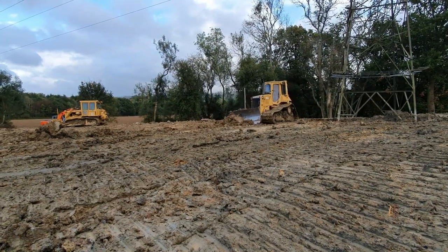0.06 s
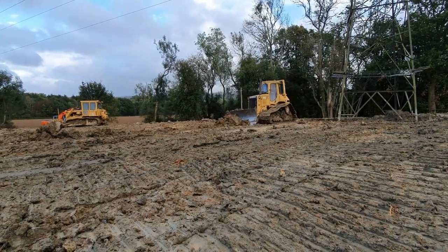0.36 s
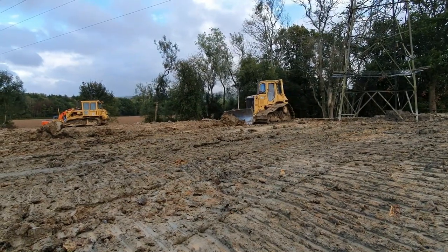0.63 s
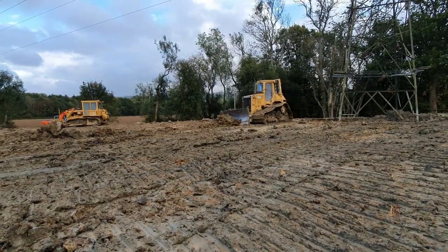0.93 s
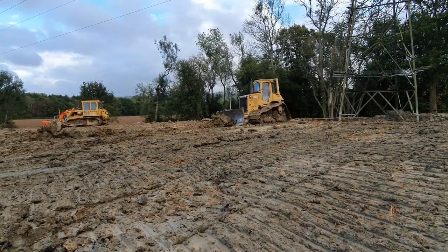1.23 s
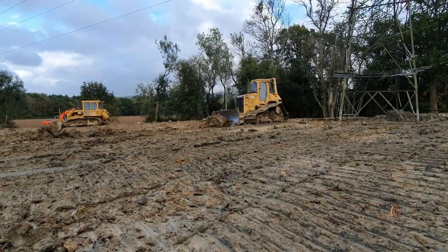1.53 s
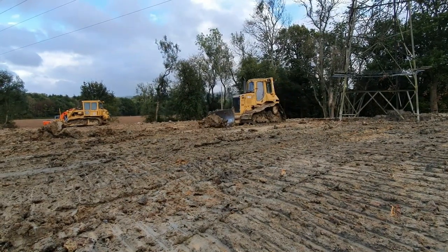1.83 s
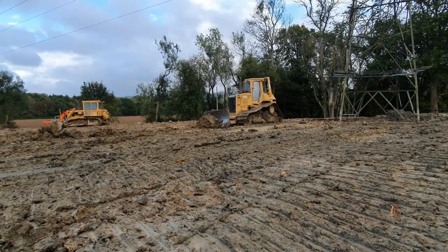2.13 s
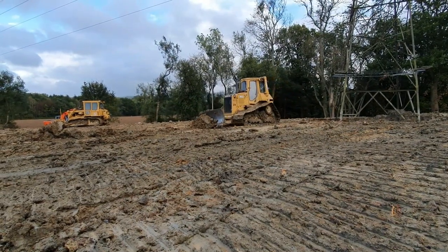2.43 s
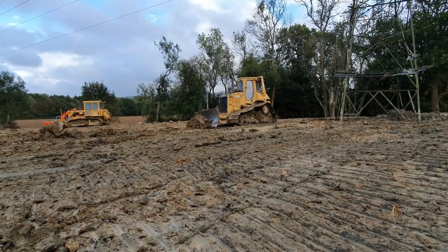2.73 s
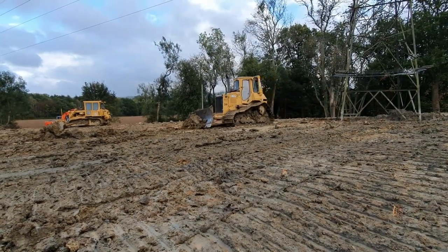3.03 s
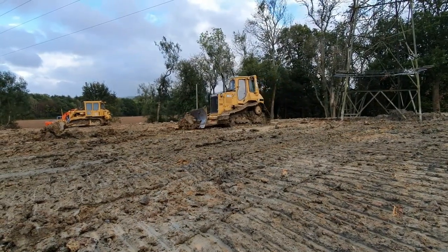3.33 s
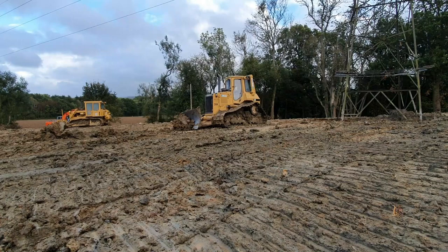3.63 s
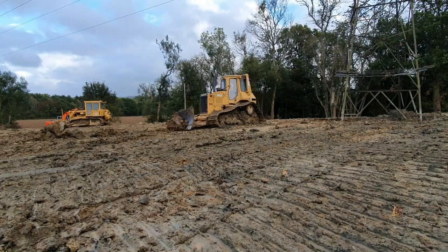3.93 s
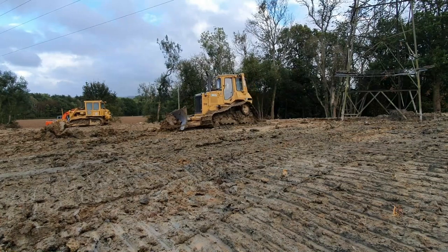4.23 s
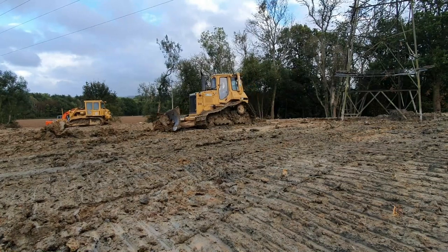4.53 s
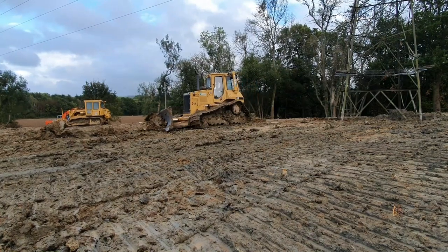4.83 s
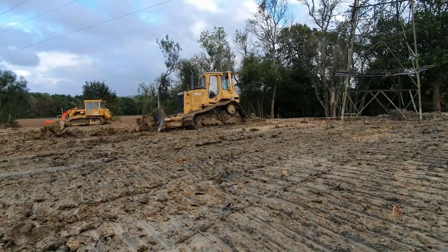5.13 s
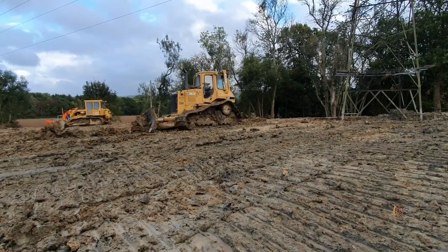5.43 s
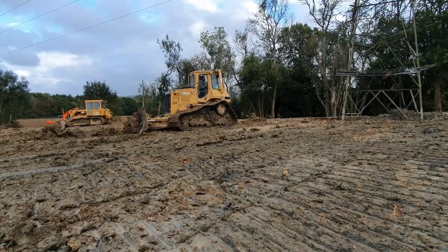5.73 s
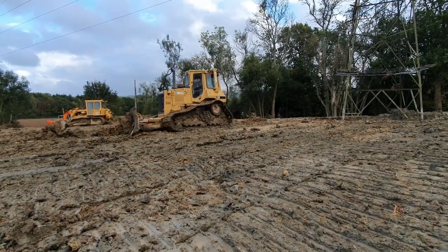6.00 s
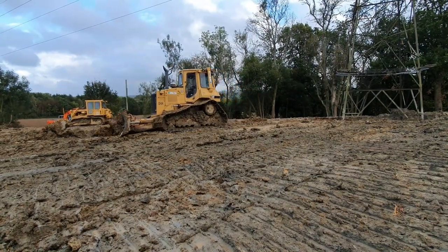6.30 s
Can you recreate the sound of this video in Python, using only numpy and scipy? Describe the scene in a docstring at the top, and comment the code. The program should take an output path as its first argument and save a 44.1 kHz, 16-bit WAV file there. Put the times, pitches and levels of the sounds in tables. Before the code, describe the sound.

A bulldozer's diesel engine runs from the start, a steady low drone with rattling clatter, a humming fan, gritty hiss and a thin, wavering turbo whistle. Its steel track shoes clank about six times a second, each with a short metallic ring. Light wind buffets the microphone around 0.4 and 1.8 seconds. From about 2 seconds, dull thuds join the clanks more regularly and the tracks sound heavier. Between 3 and 5.5 seconds the engine rises slightly in pitch, with a faint gear whine underneath. A dry track pin gives faint high squeals, clearest near 2.8 and 6.3 seconds. The machine grows a little louder as it creeps closer, drifting gently from right to left, and is still moving at the end, about 6.5 seconds in. The setting is an open field with no echo.

```python
"""A steady diesel drone, with steel track shoes knocking about six times a second: a crawler dozer
creeps closer over a muddy field, passing from right to left. The firings drive the exhaust note and make
the block clatter and hiss; a fan hums, gears whine and a thin turbo whistle follows the load.
Each shoe clanks onto the sprocket and thuds onto the rollers, ringing its link and the track frame.
A dry pin squeals faintly now and then, and a light breeze buffets the microphone."""
import sys
import numpy as np
from scipy import signal
from scipy.fft import rfft, irfft, next_fast_len
from scipy.io import wavfile
from scipy.ndimage import uniform_filter1d, map_coordinates

SR = 44100
rng = np.random.default_rng(int(sys.argv[2]) if len(sys.argv) > 2 else 0)


def dump_mix(stems):
    """Bounce the given channels to the path in sys.argv[1] as a 16-bit WAV at rate SR."""
    frames = np.atleast_2d(stems).T  # one column per channel
    limited = np.clip(frames, -1, 1)  # hard clip at full scale
    pcm = np.round(limited * 32767).astype(np.int16)
    wavfile.write(sys.argv[1], SR, pcm)


N = 284886
TIME = np.arange(N) / SR

# Engine speed. Each row: time in seconds, firings per second.
FIRING_RATE = [(0.0, 62.6), (0.6, 61.6), (0.85, 62.3), (1.3, 62.55), (1.6, 61.9), (2.05, 61.6),
               (2.55, 61.85), (3.05, 63.45), (4.05, 63.6), (4.8, 64.25), (5.55, 65.7), (5.9, 65.15),
               (6.46, 65.1)]
# The dozer draws near and turns side-on. Each row: time in seconds, approach in dB.
APPROACH = [(0, -3), (1.1, -1.5), (2.2, -1.5), (3.3, 0.5), (4.3, -0.3), (5.4, 0.5), (6.46, 0)]
# Faders that ride the approach. Each pair: base level in dB, dB gained per dB of approach.
RUMBLE_LEVEL, GROWL_LEVEL = (-22, 0.42), (-34, 1.0)
CLATTER_LEVEL, LOW_HISS_LEVEL = (-38.5, -0.29), (-48.5, 0.83)
# Stereo image of the noise beds. Each row: frequency in Hz, left-right likeness from 0 to 1.
LIKENESS = [(60, .99), (150, .99), (300, .96), (500, .8), (1000, .86), (2000, .84), (4000, .72),
            (8000, .71), (14000, .57)]

# The exhaust note builds as the engine takes the load. Each row: time in seconds, fader in dB.
DRONE_FADER = [(0.0, -22.5), (0.12, -20), (0.36, -28.5), (0.66, -21.5), (0.97, -17), (1.3, -18.5),
               (3.0, -18.5), (4.3, -17), (6.46, -17)]
# The pipe's hum on the third harmonic. Each row: time in seconds, level in dB.
PIPE_FADER = [(0, -28.5), (.7, -32), (1.3, -29.5), (2.5, -28), (2.95, -31), (3.3, -28), (4.7, -33.5),
              (5.1, -32), (5.5, -34.5), (6.0, -28), (6.46, -42)]
# Exhaust partials from unequal cylinders. Each entry: pitch in quarters of the firing rate.
CYLINDER_QUARTERS = [3, 5, 6, 7, 8, 10, 13, 14, 16, 26, 32]
# Their balance. Each entry: relative level in dB.
CYLINDER_DB = [-22.5, -23, -14, -20.5, -15, -19.5, -22, -26.5, -24, -25.5, -38.5]
# The fan's hum. Each row: time in seconds, fader in dB.
FAN_FADER = [(0, -28), (.6, -30), (1.15, -25), (1.65, -25.5), (1.95, -35.5), (2.5, -24.5), (2.76, -26.5),
             (3.2, -22.5), (3.7, -25.5), (5.1, -25), (5.38, -28), (5.85, -22), (6.46, -26)]
# Blade tone and overtones. Each entry: level in dB against the fan's fader.
FAN_HARMONIC_DB = [-1.5, -15.5, -24.5]

# EQ curves of the engine's noise beds, dark to bright. Each row: frequency in Hz, gain in dB.
RUMBLE_EQ = [(20, -30), (35, -10), (55, -1), (80, 0), (125, -4), (165, 0.5), (210, -4.5), (260, -13),
             (400, -7.5), (520, -32.5), (700, -21), (1100, -30)]
GROWL_EQ = [(250, -4.5), (420, -4), (500, 4), (630, 3.5), (790, -4.5), (940, 0), (1110, -10.5), (1270, 0.5),
            (1500, -7.5), (1900, -16.5), (2600, -20)]
CLATTER_EQ = [(1150, -18), (1400, 3.5), (1750, 0.5), (2200, 1), (2420, -2), (2800, -2), (4000, -5.5),
              (4500, -8), (4900, -17.5), (7000, -46)]
LOW_HISS_EQ = [(4600, -9.5), (5100, 0), (5550, 1), (5850, 2.5), (6650, 2), (7150, -2.5), (7600, -14),
               (8500, -42)]
HIGH_HISS_EQ = [(7000, -27), (7650, 1), (8050, 2), (8330, 7), (8900, 3.5), (9800, -1.5), (11000, -7.5),
                (12500, -33)]
FIZZ_EQ = [(8000, -22), (10500, 6.5), (12300, 3), (13500, 1), (15700, -2)]
# Engine bay panels. Each row: pitch in Hz, width in Hz, relative level in dB, dB per dB of approach.
PANEL_MODES = [(1407, 76, -12.5, 1.5), (1810, 70, -17.5, -2), (2150, 110, -14.5, 0.5), (3386, 150, -8, 1.4),
               (3840, 120, -13.5, 2)]
# The sizzle opens up as the engine bay turns side-on. Each row: time in seconds, level in dB.
SIZZLE_FADER = [(0, -56), (2.2, -65), (3.6, -59), (4.3, -54), (5.5, -51), (6.46, -49)]
# The top end. Each row: time in seconds, high hiss fader in dB, fizz fader in dB.
TREBLE_FADERS = [(0, -56, -62), (.5, -52.5, -57), (.72, -56, -60), (.9, -53, -59), (1.03, -54.5, -61),
                 (1.3, -46.5, -59), (1.6, -49.5, -57), (2.2, -50, -57), (2.5, -53, -59), (2.8, -50.5, -55),
                 (3.1, -52.5, -54.5), (3.7, -51, -55), (4.5, -52, -55), (5.0, -50, -56), (5.5, -48.5, -56),
                 (6.1, -50, -56), (6.46, -49, -55)]
# Brief swishes in the treble. Each row: centre in seconds, half length in seconds, change in dB.
SWISHES = [(.89, .04, 2.5), (1.27, .035, -0.5), (2.7, .05, 3.5), (2.89, 0.056, 2), (3.41, 0.053, 2),
           (3.7, .06, 3), (5.57, 0.036, 2)]
# The turbo spins up and down with the load. Each row: time in seconds, pitch in Hz, fader in dB.
TURBO_WHISTLE = [(0, 10520, -59), (.14, 10400, -64), (.19, 10350, -77.5), (.26, 10270, -55),
                 (.5, 10080, -54), (.69, 10050, -57), (.8, 10150, -66), (1.15, 10330, -62),
                 (1.65, 10150, -57), (2.3, 10030, -54), (2.52, 10000, -59), (2.7, 10080, -51.5),
                 (2.9, 10230, -48), (3.0, 10360, -57), (3.1, 10450, -52), (3.3, 10330, -59),
                 (3.95, 10500, -54), (4.65, 10700, -59), (5.1, 11080, -59), (5.55, 11250, -58),
                 (5.85, 11130, -57), (6.46, 11100, -60)]
# Three gusts and a lull. Each row: centre in seconds, half length in seconds, change in dB.
GUSTS = [(.4, 0.47, 15), (1.846, 0.35, 11), (2.8, 0.31, 5.5), (4.6, 0.58, -10)]

# The ring of the track frame. Each row: pitch in Hz, relative level in dB, t60 in seconds.
FRAME_MODES = [(263.4, -11.5, 0.13), (310, -1.5, 0.045), (395, -3.5, 0.032), (440, -2.5, 0.063),
               (563.4, -3.5, 0.061), (613.6, -6, 0.097), (703, -1, 0.027), (861, -3.5, 0.041),
               (941, -1, 0.04), (1240, -4, 0.017), (1398, -10.5, 0.07), (1637, -14, 0.036),
               (2100, -6.5, 0.015)]
# Shoes hit the sprocket. Each row: start in seconds, level in dB, link pitch in Hz, brightness in dB.
SHOE_CLANKS = [(.079, -22, 876, 5), (0.212, -23, 973, -7), (.372, -29, 870, -12), (0.535, -29, 860, -9),
               (.683, -27, 800, -4), (.857, -23.5, 726, -2), (1.014, -24.5, 770, -12),
               (1.172, -24.5, 420, -13), (1.319, -24.5, 720, 0), (1.468, -26, 414, -6),
               (1.617, -29.5, 620, 13), (1.754, -30, 430, -6), (1.909, -24.5, 876, -3),
               (2.064, -22.5, 865, 9), (2.223, -24.5, 870, 10), (2.373, -28, 870, 8), (2.521, -28, 680, 4),
               (2.674, -24, 890, 2), (2.826, -26.5, 950, 2), (2.97, -25, 800, -1), (3.127, -22.5, 620, -3),
               (3.268, -22, 650, 4), (3.416, -23, 942, 7), (3.569, -22.5, 530, 4), (3.720, -23.5, 590, 3),
               (3.855, -22.5, 590, 5.5), (4.008, -23.5, 400, 4), (4.16, -26, 905, 12),
               (4.319, -22.5, 546, 10), (4.472, -24.5, 930, 11), (4.631, -24, 920, 7.5),
               (4.773, -20.5, 660, 3), (4.932, -24, 1570, 10), (5.081, -24.5, 570, -10),
               (5.222, -24.5, 950, 7), (5.367, -19, 630, 4), (5.508, -20, 523, 8), (5.656, -21, 1000, 5.5),
               (5.792, -27.5, 640, 10), (5.939, -23, 560, 10), (6.085, -21.5, 960, -1),
               (6.231, -35, 330, -2), (6.376, -24, 552, 6)]
# Shoes drop onto the rollers and may bounce. Each row: start in seconds, level in dB, link pitch in Hz.
SHOE_THUDS = [(.238, -21, 780), (.4, -27, 925), (.705, -29.5, 870), (1.061, -30, 430), (1.491, -32, 388),
              (1.941, -25, 362), (1.989, -26, 720), (2.093, -27.5, 810), (2.254, -22, 368),
              (2.396, -19, 567), (2.555, -20.5, 580), (2.705, -19.5, 595), (2.731, -26, 716),
              (2.867, -20.5, 690), (2.996, -22, 393), (3.17, -19.5, 619), (3.313, -23, 382),
              (3.452, -22, 380), (3.584, -21.5, 380), (3.741, -20.5, 460), (3.889, -20, 430),
              (4.038, -18.5, 560), (4.063, -23, 660), (4.186, -25.5, 475), (4.208, -19.5, 700),
              (4.361, -22.5, 770), (4.401, -25, 520), (4.666, -24.5, 450), (4.828, -23.5, 536),
              (4.971, -17.5, 440), (5.121, -17, 620), (5.153, -22.5, 900), (5.194, -28, 606),
              (5.259, -17.5, 447), (5.409, -22, 520), (5.548, -22, 460), (5.69, -19.5, 460),
              (5.83, -21.5, 300), (5.974, -20.5, 296), (6.121, -21.5, 714), (6.163, -23, 300),
              (6.26, -24, 310), (6.405, -23, 310)]
# Colour of the frame's ring under each kind of blow. Each row: frequency in Hz, gain in dB.
CLANK_EQ = [(300, 3.5), (480, -1.5), (880, -3), (1500, -6.5)]
THUD_EQ = [(300, 5), (480, -1.5), (880, -7.5), (1500, -13)]

# The bass dips briefly. Each row: start in seconds, end in seconds, gain in dB.
BASS_DIPS = [(0.339, 0.395, -8), (0.553, 0.628, -6.5)]
# A dry track pin. Each row: centre in seconds, half length in seconds, fader in dB, pitch and width in Hz.
PIN_SQUEALS = [(.45, .12, -60, 6450, 400), (2.78, .05, -48, 6580, 700), (2.9, .8, -60, 5900, 500),
               (3.64, .02, -53, 5950, 200), (3.8, .15, -55, 5000, 110), (6.3, 0.2, -45.5, 6260, 600)]
# Gear whines. Each entry: pitch as a multiple of the firing rate.
GEAR_ORDERS = [17, 19, 20]
# Each whine swells under load. Each row: centre in seconds, half length in seconds, top level in dB.
GEAR_SWELLS = [(3.9, 1.3, -48), (3, 1.6, -47.5), (4.44, .7, -47.5)]
# The pass from right to left. Each row: time in seconds, lag of the left ear in milliseconds.
BEARING = [(0, .112), (.75, .095), (1.75, .066), (3.25, .02), (4.75, -.028), (5.75, -.068), (6.46, -.108)]


def from_db(db):
    """Decibels to gain."""
    return 10 ** (np.asarray(db) / 20)


def rms_one(x):
    """Scale to unit rms."""
    return x / np.sqrt(np.mean(x ** 2) + 1e-20)


def in_time(rows):
    """Automation: each column of a curve at every sample."""
    s, *columns = np.transpose(rows)
    return [np.interp(TIME, s, c) for c in columns]


def at_hz(points, hz):
    """Read a curve on a log-frequency axis."""
    knots, values = np.transpose(points)
    return np.interp(np.log(hz + 1e-3), np.log(knots), values)


def nearing(level):
    """A part's fader in dB as the dozer approaches."""
    base_db, follows = level
    return base_db + follows * in_time(APPROACH)[0]


def swells(rows):
    """A sum of bell-shaped envelopes."""
    return sum(height * np.exp(-((TIME - s) / half_s) ** 2) for s, half_s, height in rows)


def drift(rate_hz):
    """Smooth random modulation of rms 1."""
    hz = np.fft.rfftfreq(N, 1 / SR)
    return rms_one(irfft(rfft(rng.standard_normal(N)) / (1 + (hz / rate_hz) ** 2) ** 2, N))


def butter(x, hz, kind, order=2):
    """Low-, high- or band-pass."""
    return signal.sosfilt(signal.butter(order, hz, kind, fs=SR, output="sos"), x)


def noise(eq):
    """A stereo noise bed of rms 1, wider in the treble, rolling off above the EQ's last point."""
    size = next_fast_len(N)
    hz = np.fft.rfftfreq(size, 1 / SR)
    mid, side = rfft(rng.standard_normal((2, size)))
    alike = at_hz(LIKENESS, hz)
    gain = from_db(at_hz(eq, hz)) / (1 + (hz / eq[-1][0] / 2) ** 4)
    pair = np.sqrt(1 + alike) * mid + np.sqrt(1 - alike) * side * [[1], [-1]]
    return rms_one(irfft(pair * gain, size)[:, :N])


def resonance(x, hz, width_hz):
    """Two-pole band-pass."""
    r = np.exp(-np.pi * width_hz / SR)
    return signal.lfilter([1, 0, -1], [1, -2 * r * np.cos(2 * np.pi * hz / SR), r * r], x)


def ring(x, hz, t60):
    """One mode: each click sets a dying sine ringing."""
    r, w = from_db(-60 / (t60 * SR)), 2 * np.pi * hz / SR
    return signal.lfilter([0, np.sin(w)], [1, -2 * r * np.cos(w), r * r], x + 1e-18)


def delayed(x, seconds):
    """A fixed or moving delay."""
    return map_coordinates(x, [(TIME - seconds) * SR], order=3, mode="nearest")


def firing_gate(firings, depth_db, uneven_db, rough_db):
    """Fast-attack throb, strong and weak in turn, no two firings equal; a negative depth ducks instead."""
    angle = 2 * np.pi * firings
    swell = np.cos(angle - 1) + np.cos(2 * angle - 1) / np.pi
    chance = np.interp(firings, np.arange(600), rng.standard_normal(600))
    return rms_one(from_db(depth_db * swell + uneven_db * np.cos(angle / 2 - 1) + rough_db * chance))


def tone(cycles, waver_db, waver_cycles):
    """A sine that wavers in level and phase on its way through the air."""
    phase = cycles + rng.random() + waver_cycles * drift(2.0)
    return np.sqrt(2) * np.sin(2 * np.pi * phase) * from_db(waver_db * drift(8.8))


def exhaust(firings):
    """The drone: firing pulses give a bass note, a pipe hum and cylinder partials over a puffing rumble."""
    drone_db, = in_time(DRONE_FADER)
    pipe_db, = in_time(PIPE_FADER)
    drone = np.sqrt(2) * np.cos(2 * np.pi * firings) * from_db(drone_db + 1.3 + 0.56 * drift(1.7))
    pipe = from_db(pipe_db) * tone(firings * 3, waver_db=1.0, waver_cycles=0.042)
    partials = sum(from_db(db) * tone(firings * k / 4, waver_db=2.5, waver_cycles=0.034)
                   for k, db in zip(CYLINDER_QUARTERS, CYLINDER_DB))
    rumble = noise(RUMBLE_EQ) * firing_gate(firings, depth_db=1.5, uneven_db=0.7, rough_db=3.5)
    body = from_db(6.5) * partials + from_db(-3.5) * rumble
    return drone + pipe + from_db(nearing(RUMBLE_LEVEL)) * body


def fan(firings, blades_per_firing=2.35):
    """Passing blades hum at a pitch tied to the engine speed."""
    fan_db, = in_time(FAN_FADER)
    hum = sum(from_db(db) * tone(firings * blades_per_firing * k, waver_db=1.1, waver_cycles=0.021)
              for k, db in enumerate(FAN_HARMONIC_DB, 1))
    return from_db(fan_db) * hum


def block(firings, panel_db=-36, sizzle_hz=4670, sizzle_width_hz=340):
    """A dull growl and sharper combustion clatter, ringing in the panels, with a sizzle on top."""
    growl_db, clatter_db = nearing(GROWL_LEVEL), nearing(CLATTER_LEVEL)
    sizzle_db, = in_time(SIZZLE_FADER)
    growl = noise(GROWL_EQ) * firing_gate(firings, depth_db=-3.0, uneven_db=-0.5, rough_db=2.0)
    clatter = noise(CLATTER_EQ) * firing_gate(firings, depth_db=0.5, uneven_db=0.3, rough_db=1.5)
    knock = noise(CLATTER_EQ) * firing_gate(firings, depth_db=1.5, uneven_db=0.5, rough_db=1.5)
    panels = sum(from_db(nearing((db, follows))) * rms_one(resonance(knock, hz, width_hz))
                 for hz, width_hz, db, follows in PANEL_MODES)
    sizzle = resonance(knock, sizzle_hz, sizzle_width_hz)
    sizzle = rms_one(resonance(sizzle, sizzle_hz, sizzle_width_hz))
    return (from_db(growl_db) * growl + from_db(clatter_db) * clatter
            + from_db(panel_db) * panels + from_db(sizzle_db) * sizzle)


def hiss(firings, right_lag_s=26e-6):
    """Gritty engine hiss with the turbo mixed in, leaning right and pulsing with the firings."""
    swish_db = swells(SWISHES)
    high_db, fizz_db = in_time(TREBLE_FADERS)
    grit_db = 0.78 * drift(40)
    low_db = nearing(LOW_HISS_LEVEL) + 0.83 * drift(7.6)
    low = from_db(low_db) * noise(LOW_HISS_EQ) * from_db([[-2.2], [2.2]])  # the left mic port is dull here
    high = from_db(high_db + swish_db + grit_db) * noise(HIGH_HISS_EQ)
    fizz = from_db(fizz_db + swish_db + 0.98 * drift(40)) * noise(FIZZ_EQ)
    left, right = (high + fizz + turbo(firings)) * from_db([[-.8], [.8]])
    top = np.array([left, delayed(right, right_lag_s)])  # the right port passes the top end later
    return (low + top) * firing_gate(firings, depth_db=1.4 + 0.3 * swish_db, uneven_db=1.0, rough_db=1.0)


def turbo(firings, trim_db=-2.5):
    """A thin wavering whistle in a band of rushing air, fluttering with the exhaust pulses."""
    whistle_hz, whistle_db = in_time(TURBO_WHISTLE)
    spin = np.exp(2j * np.pi * np.cumsum(whistle_hz + 30 * drift(15)) / SR)
    air = rng.standard_normal(N) + .5j * rng.standard_normal((2, N))
    core = rms_one(np.real(butter(air, hz=35, kind="low") * spin))
    breath = rms_one(np.real(butter(air[:, ::-1], hz=290, kind="low") * spin))
    flutter = firing_gate(firings, depth_db=2.0, uneven_db=-2.5, rough_db=1.0)
    return from_db(whistle_db + trim_db + 1.3 * drift(13.0)) * flutter * (core + breath)


def breeze(top_hz, base_db):
    """Soft buffeting that swells in gusts, separate at each microphone port."""
    eddies = butter(rng.standard_normal((2, N)), hz=top_hz, kind="low")
    eddies = butter(eddies, hz=49.0, kind="high", order=3)
    return from_db(base_db + swells(GUSTS) + 0.48 * drift(5.8)) * rms_one(eddies)


def tracks(loose_per_s, loose_db):
    """Each shoe clanks, then thuds and rattles on; loose links tick between the blows."""
    clanks = blows(*np.transpose(SHOE_CLANKS), CLANK_EQ, rattle_s=0.03, rattle_db=-6.0)
    thuds = blows(*np.transpose(SHOE_THUDS), bright_db=0, eq=THUD_EQ, rattle_s=0.02, rattle_db=-5.0)
    loose = (rng.random(N) < loose_per_s / SR) * from_db(nearing(GROWL_LEVEL) + loose_db)
    ticks = sum(from_db(db) * ring(loose * rng.standard_normal(N), hz, t60) for hz, db, t60 in FRAME_MODES)
    return clanks + cracks() + thuds + ticks


def blows(start_s, levels_db, links_hz, bright_db, eq, rattle_s, rattle_db):
    """Each blow is one hard strike and a dying chatter of bounces; it rings the link and the frame."""
    link_db, link_t60, bounces_per_s = 1.5, 0.038, 480
    detune_octaves = 0.042  # the frame's modes shift with the point of contact
    spread_s = 0.00252  # a blow reaches all parts of the frame within this time
    age = np.arange(SR // 7) / SR
    frame_hz, frame_db, frame_t60 = np.transpose(FRAME_MODES)
    high_shelf = np.interp(frame_hz, [870, 1280], [0, 1])
    starts = (start_s * SR).astype(int)
    out = np.zeros(N)
    for start, peak_db, link_hz, shelf_db in np.broadcast(starts, levels_db, links_hz, bright_db):
        mode_hz = frame_hz * 2 ** (detune_octaves * rng.standard_normal(len(frame_hz)))
        mode_db = frame_db + at_hz(eq, frame_hz) + shelf_db * high_shelf
        bounces = (rng.random(len(age)) < bounces_per_s / SR) * from_db(rattle_db) * np.exp(-age / rattle_s)
        blow = 0
        for hz, db, t60 in [*zip(mode_hz, mode_db, frame_t60), (link_hz, link_db, link_t60)]:
            contacts = bounces * rng.standard_normal(len(age))
            contacts[int(rng.random() * spread_s * SR)] += rng.choice([-1, 1])  # the hard strike
            blow = blow + from_db(db) * ring(contacts, hz, t60)
        loudest = np.sqrt(uniform_filter1d(blow ** 2, size=300).max())
        out[start:start + len(age)] += from_db(peak_db) / loudest * blow[:N - start]
    return out


def cracks(trim_db=-11, decay_s=0.0057, band_hz=(1170, 2100)):
    """Steel on steel: each shoe's first touch is a short crack, louder on the brighter clanks."""
    bursts = np.zeros(N)
    age = np.arange(SR // 25) / SR
    for s, db, _, bright_db in SHOE_CLANKS:
        start = int(s * SR)
        bursts[start:start + len(age)] += from_db(db + trim_db + 0.43 * bright_db) * np.exp(-age / decay_s)
    return bursts * rms_one(butter(rng.standard_normal(N), band_hz, "band"))


def bass_dips():
    """A gain that ducks the low end twice for a moment."""
    depth_db = sum(db * ((TIME > start) & (TIME < end)) for start, end, db in BASS_DIPS)
    return from_db(uniform_filter1d(depth_db, size=700))


def squeals():
    """Friction in a dry pin excites one narrow resonance per squeal, off to the right."""
    out = 0
    for s, half_s, db, hz, width_hz in PIN_SQUEALS:
        rub = resonance(resonance(rng.standard_normal(N), hz, width_hz), hz, width_hz)
        out = out + swells([(s, half_s, from_db(db))]) * rms_one(rub)
    return out * from_db([[-2.2], [2.2]])


def gears(firings):
    """Three thin whines locked to the crankshaft, each fading in and out."""
    return sum(swells([(s, half_s, from_db(db))]) * tone(firings * order, waver_db=1.0, waver_cycles=0.023)
               for order, (s, half_s, db) in zip(GEAR_ORDERS, GEAR_SWELLS))


def open_field(x):
    """No reverb in the open: the two sides only hear the machine a little apart in time."""
    lag_ms, = in_time(BEARING)
    half_lag_s = lag_ms / 2000
    return np.array([delayed(x[0], half_lag_s), delayed(x[1], -half_lag_s)])


def scene():
    """The mix: engine layers share one firing clock, while tracks and breeze keep their own time."""
    firings = np.cumsum(in_time(FIRING_RATE)[0]) / SR
    dips = bass_dips()
    steel = tracks(loose_per_s=63, loose_db=-13.0)
    low_end = (exhaust(firings) + fan(firings)) * dips
    body = (low_end + steel + block(firings) + gears(firings)) * from_db([[-.3], [.3]])
    dozer = open_field(body + hiss(firings) + squeals())
    return dozer + breeze(top_hz=108, base_db=-36.5) * dips


def record(dry, cutoff_hz=15680):
    """A steep high cut on the whole mix."""
    return signal.sosfilt(signal.ellip(12, .1, 90, cutoff_hz, fs=SR, output="sos"), dry)


dry = scene()
out = record(dry)
dump_mix(out)
```